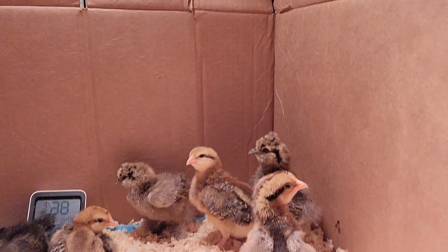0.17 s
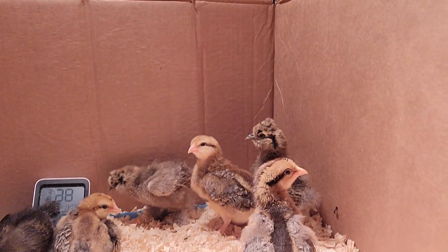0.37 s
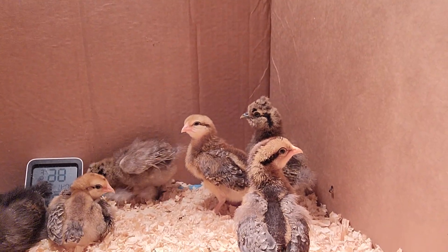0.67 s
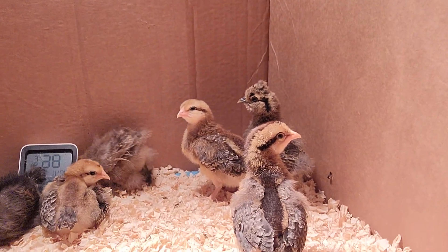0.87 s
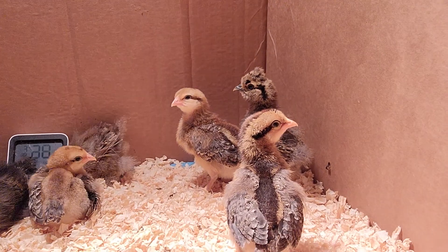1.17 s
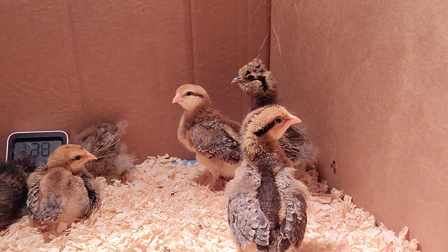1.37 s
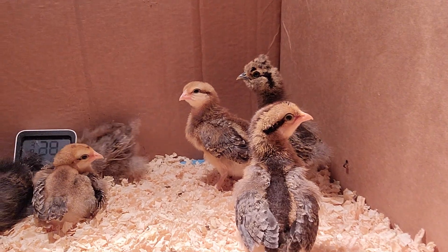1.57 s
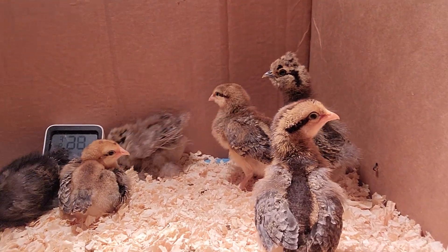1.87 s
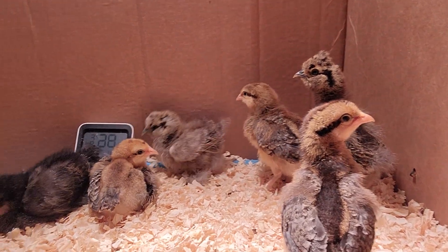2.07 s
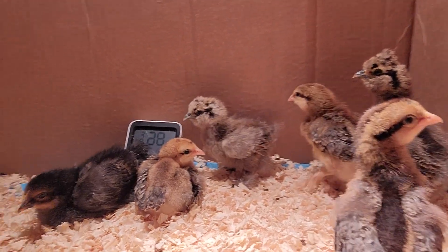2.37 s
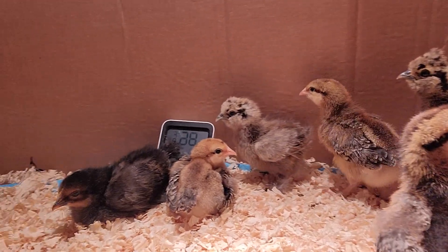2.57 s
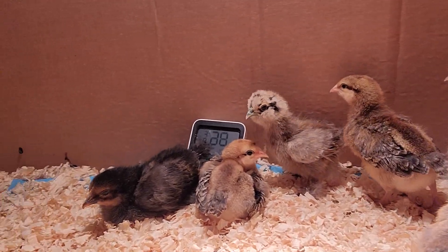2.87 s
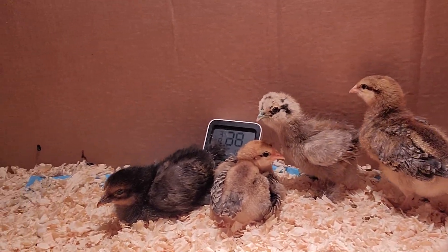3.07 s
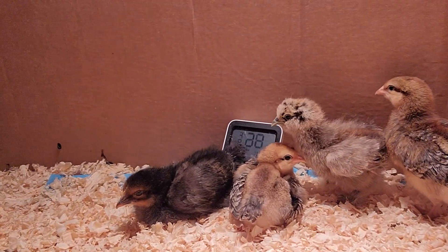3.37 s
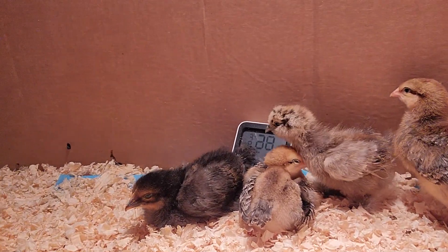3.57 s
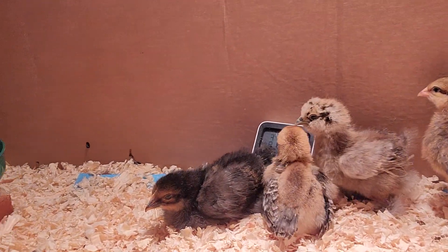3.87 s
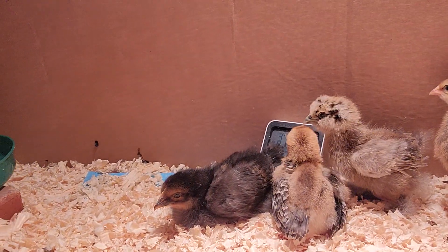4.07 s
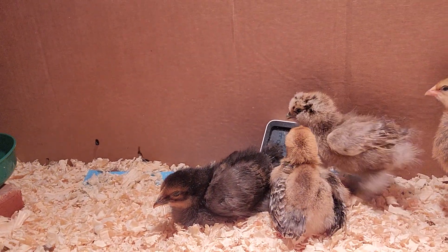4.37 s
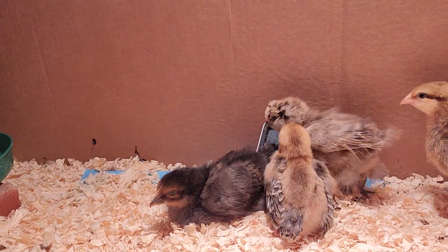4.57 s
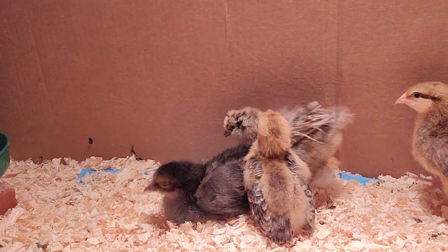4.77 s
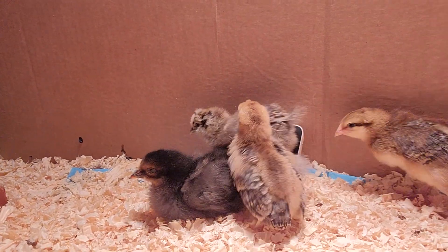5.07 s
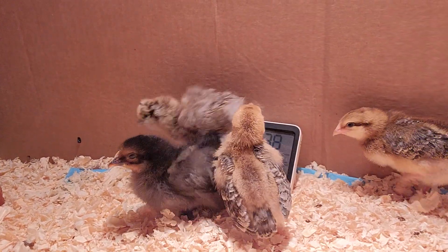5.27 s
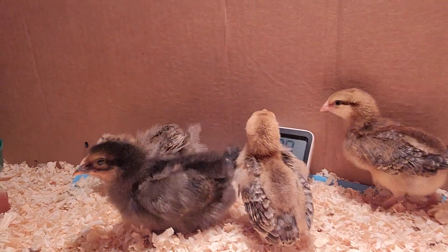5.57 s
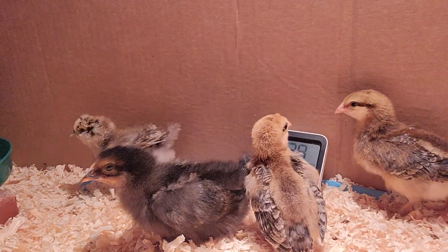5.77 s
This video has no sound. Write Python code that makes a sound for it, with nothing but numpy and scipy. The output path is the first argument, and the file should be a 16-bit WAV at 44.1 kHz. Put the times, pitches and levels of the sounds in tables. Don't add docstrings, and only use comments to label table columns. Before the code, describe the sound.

Young chicks give quick, high gliding peeps in a cardboard box while shavings rustle, a fan hums low, and soft bumps end in shoves.

```python
import sys
import numpy as np
from scipy import signal
from scipy.io import wavfile
from scipy.ndimage import uniform_filter1d

SR = 44100
rng = np.random.default_rng(int(sys.argv[2]) if len(sys.argv) > 2 else 0)


def volts(x):
    e = np.asarray(x, float) / 20
    return 10 ** e


def wav_out(sig):
    wavfile.write(sys.argv[1], SR, np.round(np.clip(np.atleast_2d(sig).T, -1, 1) * 32767).astype(np.int16))


N = 260631


def rms_one(x):
    return x / np.sqrt(np.mean(x ** 2) + 1e-20)


def in_time(rows):
    s, *columns = np.transpose(rows)
    return [np.interp(np.arange(N) / SR, s, c) for c in columns]


def at_hz(points, hz):
    table_hz, table_db = np.transpose(points)
    return np.interp(np.log(hz), np.log(table_hz), table_db)


def drift(rate_hz):
    r = np.exp(-80 * np.pi * rate_hz / SR)
    white = rng.standard_normal(N // 40 + 2002)
    slow = signal.lfilter([1], [1, -2 * r, r * r], white)[2000:]
    return np.interp(np.arange(N) / 40, np.arange(len(slow)), rms_one(slow))


def ring(clicks, hz, t60_s):
    r = volts(-60 / (t60_s * SR))
    w = 2 * np.pi * hz / SR
    return signal.lfilter([0, np.sin(w)], [1, -2 * r * np.cos(w), r * r], clicks + 1e-18)


def dying(clicks, t60_s):
    return signal.lfilter([1], [1, -volts(-60 / (t60_s * SR))], clicks + 1e-18)


def band(order, low_hz, high_hz):
    return signal.butter(order, [low_hz, high_hz], "band", fs=SR, output="sos")


# pitch_hz, likeness (1 = same)
PORT_LIKENESS = [(60, 0.91), (250, 0.86), (500, 0.52), (1000, 0.022), (4000, 0.014), (12000, 0.02)]


def grainy_noise(spectrum, patchy_db, grain_db):
    low_hz, top_hz = spectrum[0][0], spectrum[-1][0]
    edges = np.geomspace(low_hz, top_hz, 1 + int(3 * np.log2(top_hz / low_hz) + .5))
    white = rng.standard_normal((2, 2, N)) * volts(grain_db * drift(120))
    out = 0
    for k, (low, high) in enumerate(zip(edges, edges[1:])):
        mid, side = signal.sosfilt(band(2, low, high), white[k % 2])
        hz = np.sqrt(low * high)
        alike = at_hz(PORT_LIKENESS, hz)
        gain = volts(at_hz(spectrum, hz) + patchy_db * drift(3.47))
        out = out + gain * (np.sqrt(1 + alike) * mid + np.sqrt(1 - alike) * side * [[1], [-1]])
    return rms_one(out)


# start_s, level_db
FAN_HUM = [(0, -60.5), (.69, -59.5), (.79, -59), (1.17, -53), (1.5, -50.5), (2.5, -56.5), (3.41, -58),
           (3.46, -60.5), (3.52, -81), (3.69, -65), (3.75, -57.5), (4.35, -55), (4.51, -56.5), (5.3, -53),
           (5.74, -58), (5.91, -63.5)]
# pitch_hz, level_db (per Hz)
FAN_RUMBLE = [(22, -35.5), (40, -27), (58, -2), (75, -4), (95, 2), (125, -14), (160, -14.5), (220, -33)]


def fan():
    hum_hz, rumble_db, rumble_follows, sway_db, sway_s = 100.37, -57.5, .3, -42.5, .05
    hum_db, = in_time(FAN_HUM)
    phase = 2 * np.pi * np.cumsum(hum_hz + 1.575 * drift(3.6)) / SR
    hum = np.sqrt(2) * volts(hum_db + 0.5 + 0.5 * drift(1.5)) * np.sin(phase)
    from_shove_s = np.abs(np.arange(N) / SR - SHOVES[0][0])
    sway = volts(sway_db) * np.exp(-from_shove_s / sway_s)
    rumble = volts(rumble_db + rumble_follows * (hum_db - hum_db.mean())) + sway
    return hum + rumble * grainy_noise(FAN_RUMBLE, patchy_db=2.5, grain_db=4.5)


# start_s, level_db
RESTLESS = [(0, -73.5), (.18, -83.5), (.5, -77), (1.0, -78.5), (1.25, -86.5), (1.75, -79), (2.24, -82),
            (2.6, -78.5), (2.88, -81.5), (3.11, -76.5), (3.46, -84), (3.7, -76.5), (4.2, -80.5), (4.5, -76),
            (4.8, -75.5), (5.2, -71.5), (5.55, -73.5), (5.91, -70.5)]
# start_s, level_db (peak), dying_s, crispness_db
STIRS = [(.76, -87.5, 0.85, -13), (1.02, -75, 0.21, -5), (1.389, -74, 0.072, -7), (1.73, -71.5, 0.057, -2),
         (1.833, -71.5, 0.12, 0), (2.022, -67.5, 0.038, 4), (2.504, -70.5, 0.05, 2.5),
         (3.312, -73, 0.14, 3), (3.512, -71, 0.2, 0.5), (4.28, -80, 0.043, 7.5), (4.37, -73, 0.037, 2.5),
         (4.66, -69.5, 0.14, -2.5), (5.11, -69, 0.17, -1), (5.31, -69.5, 0.043, 1), (5.35, -64.5, 0.025, 2),
         (5.415, -67.5, 0.064, 14.5), (5.44, -63, 0.14, -1.5), (5.674, -71, 0.085, 10)]


def stirring(follows, crisp_share):
    resting_db, rise_s = -91, .0051
    restless_db, = in_time(RESTLESS)
    power = volts(2 * (resting_db + follows * (restless_db - resting_db)))
    t = np.arange(N) / SR
    for s, db, dying_s, crisp_db in STIRS:
        shape = np.exp(np.minimum((t - s) / rise_s, 2 * (s - t) / dying_s))
        power = power + volts(2 * (db + crisp_share * crisp_db)) * shape
    return np.sqrt(power)


# pitch_hz, level_db (per Hz)
CRISP = [(1800, -67), (2600, -1), (3400, 7), (4500, 3), (5600, -3), (9500, -5.5), (12000, -7), (15700, 6.5)]
# pitch_hz, level_db (per Hz)
SCUFF = [(700, 9), (1000, 0.5), (1350, 1), (1700, 2.5), (2200, 2), (3200, -2)]
# pitch_hz, level_db (per Hz)
SHUFFLE = [(110, 7), (160, -55.5), (250, 1.5), (450, 1.5), (750, -8), (1000, -39)]


def rustle():
    out = volts(6.5) * stirring(1, 0.57) * grainy_noise(CRISP, patchy_db=1.6, grain_db=2.0)
    out += volts(0.5) * stirring(1, -0.75) * grainy_noise(SCUFF, patchy_db=3.0, grain_db=1.5)
    out += volts(6) * stirring(0.77, -0.79) * grainy_noise(SHUFFLE, patchy_db=-2.0, grain_db=2.5)
    return out


# start_s, level_db (peak), left_minus_right_db
SNAPS = [(0.0385, -58, 12), (1.018, -54, -3), (1.845, -48.5, -9), (2.007, -51.5, -10), (2.492, -59, -15),
         (3.241, -58, 0), (3.3169, -59, -0.5), (3.5118, -66, -1), (3.6511, -83, 30), (4.282, -56, 2),
         (4.3879, -58, -8), (4.672, -51.5, -17), (5.1162, -42, -6), (5.2135, -53.5, -12), (5.231, -54, -2),
         (5.3107, -54, -24.5), (5.353, -44, -1), (5.3706, -52, -12), (0.866, -71, -5), (1.171, -55, -2),
         (4.596, -53, 0), (5.4186, -46, -11), (5.5026, -54, -22), (5.6725, -72, -8), (5.7145, -45, 1),
         (5.834, -49, 4)]


def snaps():
    s, db, pan_db = np.transpose(SNAPS)
    hits = np.zeros((2, N))
    hits[:, np.round(s * SR).astype(int)] = volts(db - 8.0 + pan_db * np.array([[.5], [-.5]]))
    noise = dying(hits, .045) * rng.standard_normal((2, N))
    return signal.sosfilt(signal.butter(1, 5000, "high", fs=SR, output="sos"), noise)


def room(x):
    t60_s, level_db = .14, -12.5
    t = np.arange(round(.3 * SR)) / SR
    tail = rng.standard_normal((2, len(t))) * volts(-60 * t / t60_s) * (t > .004)
    tail = tail / np.sqrt(np.sum(tail ** 2, axis=1, keepdims=True))
    return volts(level_db) * signal.fftconvolve(x, tail, axes=1)


def glide(length_s, first_hz, last_hz):
    half_share, sharpness = .6, 2.5
    share = np.linspace(0, 1, round(length_s * SR))
    bend = np.log(1 - .5 ** (1 / sharpness)) / np.log(half_share)
    return share, first_hz + (last_hz - first_hz) * (1 - (1 - share ** bend) ** sharpness)


# start_s, pitch_hz, level_db
FLAT_CALLS = [
    [(1.089, 3900, -58), (1.1, 4030, -59), (1.12, 4290, -57), (1.15, 4330, -55), (1.174, 4270, -48),
     (1.187, 3880, -48.5), (1.197, 3080, -48.5), (1.205, 2700, -64)],
    [(1.446, 4090, -58), (1.458, 4460, -51), (1.475, 4580, -47.5), (1.534, 4450, -43), (1.543, 3950, -46.5),
     (1.551, 3170, -45), (1.558, 2700, -51)],
    [(5.347, 4230, -46), (5.36, 4320, -42), (5.385, 4420, -46), (5.399, 4470, -54), (5.411, 4490, -47),
     (5.418, 3900, -41.5), (5.424, 3110, -38.5), (5.43, 2520, -56)],
]
NEAR_CALLS = [
    [(.638, 4280, -64), (.65, 4550, -59), (.668, 4580, -63), (.685, 4270, -57), (.708, 4020, -53.5),
     (.722, 3250, -47), (.735, 2810, -66.5)],
    [(2.203, 4000, -57), (2.212, 4330, -54), (2.235, 4486, -44.5), (2.255, 4390, -48), (2.28, 3960, -45),
     (2.3, 3083, -41), (2.318, 2410, -64)],
    [(3.197, 3960, -54), (3.21, 4154, -50), (3.225, 4185, -47), (3.255, 4105, -50.5), (3.27, 3840, -53.5),
     (3.29, 3013, -46.5), (3.305, 2630, -71)],
    [(4.571, 4050, -54), (4.58, 4350, -48), (4.6, 4580, -42), (4.625, 4356, -47.5), (4.655, 4080, -42.5),
     (4.68, 3060, -40.5), (4.697, 2510, -62.5)],
    [(5.101, 4105, -49), (5.115, 4480, -50), (5.13, 4560, -37.5), (5.15, 4650, -35.5), (5.17, 4350, -41),
     (5.188, 3630, -33), (5.203, 2500, -43.5)],
    [(5.716, 3900, -48.5), (5.73, 4270, -55), (5.745, 4340, -53), (5.77, 4240, -55), (5.795, 3730, -42),
     (5.808, 3400, -44), (5.823, 3050, -42), (5.833, 2700, -54.5), (5.846, 2650, -62)],
]
MID_CALLS = [
    [(3.757, 4100, -54), (3.77, 4400, -55), (3.79, 4380, -40.5), (3.82, 4215, -37.5), (3.845, 3840, -41.5),
     (3.862, 2990, -42), (3.878, 2480, -69.5)],
    [(4.038, 4170, -50.5), (4.055, 4390, -43), (4.07, 4390, -44.5), (4.1, 4240, -40), (4.125, 3840, -43),
     (4.14, 3035, -41), (4.157, 2390, -57.5)],
]
FAR_CALLS = [
    [(.427, 4280, -64), (.438, 4360, -55.5), (.455, 4470, -61), (.48, 4200, -60), (.5, 3450, -52.5),
     (.52, 3200, -63.5)],
    [(1.966, 4190, -57), (1.98, 4720, -53), (1.99, 4750, -47), (2.01, 4640, -44.5), (2.035, 4080, -47),
     (2.06, 3520, -41), (2.077, 3020, -61)],
]
# start_s, pitch_hz, level_db
BENT_CALLS = [
    [(.16, 2830, -65), (.18, 2830, -50), (.195, 3450, -48), (.212, 4000, -62), (.222, 4080, -77)],
    [(.235, 4080, -53), (.25, 4100, -54), (.265, 3656, -45), (.283, 3435, -52.5), (.312, 3010, -65)],
    [(2.93, 3790, -63), (2.945, 3850, -71), (2.965, 3800, -55), (2.982, 3410, -50), (3.005, 3250, -57)],
    [(3.906, 4080, -55), (3.918, 4030, -46.5), (3.935, 3940, -49.5), (3.965, 3230, -49), (3.988, 3020, -59)],
    [(5.146, 3200, -61), (5.158, 3035, -46), (5.17, 2800, -34.5), (5.183, 2530, -46.5), (5.193, 2430, -56)],
    [(5.422, 2036, -49), (5.432, 2563, -47), (5.441, 3060, -40.5), (5.452, 3350, -56)],
    [(5.457, 3000, -54), (5.462, 2650, -48), (5.466, 2400, -47), (5.471, 2150, -52)],
]
# start_s, length_s, first_pitch_hz, last_pitch_hz, level_db
SLIDES_LEFT = [
    (0.763, 0.077, 3807, 2690, -47.5),
    (1.697, 0.055, 3680, 3020, -47.5),
    (2.772, 0.056, 3510, 2730, -50),
    (3.737, 0.068, 3670, 2830, -48),
    (5.001, 0.066, 3610, 2544, -49),
    (5.025, 0.057, 2736, 2280, -45.5),
]
SLIDES_MID = [
    (0.615, 0.05, 3616, 2680, -45),
    (4.295, 0.058, 3112, 2830, -47),
]
# share of its length, level_db
SLIDE_EFFORT = [(0, -9), (.15, -5.5), (.45, -3.5), (.75, -7), (1, -16)]
# start_s, length_s, first_pitch_hz, last_pitch_hz, level_db
SECOND_VOICE = [
    (5.456, 0.018, 3150, 3080, -48),
    (3.774, 0.046, 4600, 4500, -54),
    (5.7, 0.024, 3170, 2950, -58),
    (5.348, 0.059, 4720, 4900, -54.5),
    (5.737, 0.037, 4600, 4500, -53.5),
]
# pitch_hz, level_db
COLOURS = [
    [(3100, 2.5), (3500, -4.5), (3850, 2.5), (4100, 4), (4280, -4), (4430, 0), (4550, -4.5)],
    [(2500, -2), (2950, 8.5), (3400, 0), (3850, 0), (4250, 2.5), (4450, -4), (4650, -0.5)],
    [(2850, 1), (3400, -7.5), (3950, 2), (4120, -1), (4290, 1.5), (4340, -3), (4420, -1.5)],
    [(3200, 8.5), (3600, -4), (3950, 9.5), (4150, 3), (4400, -1.5), (4600, 1), (4800, -4)],
    [(2500, -2), (3100, -1), (3600, -3.5), (4100, 0)],
]
SLIDE_COLOURS = [
    [(2800, -2.5), (3150, 3.5), (3350, -5.5), (3550, -1), (3750, -6.5), (4000, 11), (4800, 6)],
    [(2700, -4), (2950, -5.5), (3150, 4.5), (3350, -12), (3550, -1), (3950, -27)],
]
# left_minus_right_db, rasp_depth_db,
# octave_db
SEATS = [
    (0.5, -12.5, -27.5),
    (1.5, 19.5, -31.5),
    (-0.8, 1, -32),
    (0.8, 11, -32),
    (6, 1.5, -42.5),
    (1, 1.5, -52),
]
LEANS_DB = [3.5, 1.5, 3, 2.5, 2, 2.5, 4, 3, 1.5, -2, 0, -3, -1, 1, 3, 3, -1, 10, 5, 2]


def calls():
    leans = iter(LEANS_DB)
    broods = (FLAT_CALLS, NEAR_CALLS, MID_CALLS, FAR_CALLS, BENT_CALLS)
    for arches, colour, seat in zip(broods, COLOURS, SEATS):
        for s, hz, db in map(np.transpose, arches):
            t = np.arange(s[0], s[-1], 1 / SR)
            hz = uniform_filter1d(np.interp(t, s, hz), size=350, mode="nearest")
            yield s[0], hz, np.interp(t, s, db) + at_hz(colour, hz), (next(leans), *seat[1:])
    for rows, colour, seat in zip((SLIDES_LEFT, SLIDES_MID), SLIDE_COLOURS, SEATS[-2:]):
        for s, length_s, first_hz, last_hz, db in rows:
            share, hz = glide(length_s, first_hz, last_hz)
            effort_db = np.interp(share, *np.transpose(SLIDE_EFFORT))
            yield s, hz, db + effort_db + at_hz(colour, hz), seat
    for s, length_s, first_hz, last_hz, db in SECOND_VOICE:
        share, hz = glide(length_s, first_hz, last_hz)
        yield s, hz, db - 7.1 * share ** 2, SEATS[-2]


# centre_s, level_db
SWELLS = [(.185, 5), (.255, -7), (0.273, 8), (.48, 6.5), (.632, 3.5), (.682, 2), (0.711, 7), (.773, 6),
          (0.793, 12), (1.092, 2.5), (1.158, 8), (1.187, 5), (1.451, 4.5), (1.467, 6), (1.491, -7),
          (1.503, 1.5), (1.545, 6.5), (2.041, 7), (2.048, -4), (2.227, 3), (2.243, -7), (2.255, 2),
          (2.268, 3), (2.279, 13), (2.806, 6.5), (3.218, 1), (3.244, 2.5), (3.254, 3), (3.289, 7),
          (3.763, 3), (3.778, 3.5), (3.808, 0), (3.82, 3), (3.862, 5), (3.912, -3), (3.932, 6.5),
          (3.968, 4.5), (4.047, 3), (4.093, 7), (4.115, 5), (4.14, 11), (4.581, 1), (4.601, 1), (4.628, 0),
          (4.648, 3.5), (4.671, -8.5), (4.681, -2), (4.69, -6), (5.105, -3), (5.133, 3), (5.144, 2.5),
          (5.172, -2.5), (5.42, 6), (5.433, -2.5), (5.441, 4), (5.453, -12), (5.46, 4), (5.752, 4),
          (5.811, 7), (5.823, 8)]
# centre_s, depth_db
DIPS = [(.64, 11), (.672, 10), (.695, 14), (.782, 14), (.801, 12), (1.114, 8), (1.178, 10), (1.456, 12),
        (1.474, 12), (1.511, 5), (2.214, 8), (2.239, 8), (2.262, 12), (2.274, 12), (2.285, 16),
        (3.203, 6), (3.21, 8), (3.237, 6), (3.25, 20), (3.27, 12), (3.77, 12), (3.796, 9), (3.826, 14),
        (3.849, 12), (3.857, 12), (3.918, 13), (3.945, 16), (3.961, 9), (4.057, 9), (4.081, 7),
        (4.107, 21), (4.123, 9), (4.131, 17), (4.592, 14), (4.616, 6), (4.633, 14), (4.639, 18),
        (4.654, 14), (5.109, 10), (5.154, 16), (5.772, 6), (5.8, 14)]


def level_flutter():
    swell_s, dip_s = .0062, .0022
    t = np.arange(N) / SR
    flutter_db = 1.3 * drift(80)
    for s, db in SWELLS:
        flutter_db = flutter_db + db * np.exp(-((t - s) / swell_s) ** 2)
    for s, db in DIPS:
        flutter_db = flutter_db - db * np.exp(-((t - s) / dip_s) ** 2)
    return flutter_db


# start_s, extra_rasp_db, clear_s
HOARSE = [(.16, 2, .23), (.235, 2, .31), (.427, 2, .52), (.642, 4, .7), (1.087, 5, 1.145), (2.2, 3, 2.27),
          (2.773, 2, 2.83), (2.93, 2.5, 3.0), (3.196, 3.5, 3.275), (3.757, 3, 3.85), (5.423, 4, 5.46),
          (5.456, 3, 5.48), (5.712, 4.5, 5.798)]
MUFFLED_S = [1.087, 5.716]


def peeps():
    rasp_hz, far_wall_s, far_wall_db = 283, .0095, -11
    pan_db_per_octave = 7
    out = np.zeros((2, N + SR))
    every = list(calls())
    bounce_s = 0.001013 + .007 * rng.random((len(every), 2, 4))
    lag_s = .00005 * np.sign(rng.uniform(-1, 1, len(every)))
    flutter_db, waver_hz = level_flutter(), 25 * drift(60)
    buzz = 2 * np.pi * np.cumsum(rasp_hz + 75 * drift(50)) / SR
    for (s, hz, db, (pan_db, rasp_db, octave_db)), bounces, lag in zip(every, bounce_s, lag_s):
        now = round(s * SR) + np.arange(len(hz))
        rasp_db = np.clip(rasp_db, 0, .6)
        for at_s, hoarse_db, clear_s in HOARSE:
            if abs(at_s - s) < .006:
                rasp_db = rasp_db + hoarse_db * np.clip((clear_s - now / SR) / .01, 0, 1)
        octave_db = min(octave_db, -28)
        if any(abs(at_s - s) < .006 for at_s in MUFFLED_S):
            octave_db -= 20
        hz = hz + waver_hz[now]
        phase = 2 * np.pi * np.cumsum(hz) / SR - 0.019 * rasp_db * np.cos(buzz[now])
        level = volts(db + flutter_db[now] + rasp_db * np.sin(buzz[now]))
        fade = np.clip(np.minimum(now - now[0], now[-1] - now) / SR / 0.0024, 0, 1)
        octave = volts(octave_db + 5 * np.log2(3800 / hz)) * np.sin(2 * phase)
        tone = np.sqrt(2) * level * fade * (np.sin(phase) + octave)
        tail = room(tone[None])
        out[:, now[0]:now[0] + tail.shape[1]] += tail
        lean_db = pan_db + pan_db_per_octave * np.log2(hz / 3900)
        for port, side in enumerate((.5, -.5)):
            delays_s = [0, far_wall_s + .1 * bounces[port, 0], *bounces[port]]
            losses_db = [-1, far_wall_db, *(-14 - 500 * bounces[port])]
            for delay, loss_db in zip(delays_s, losses_db):
                at = round((s + delay + side * lag) * SR)
                out[port, at:at + len(now)] += volts(loss_db + side * lean_db) * tone
    return out[:, :N]


# pitch_hz, width_hz, level_db
AIR_MODES = [
    (2716, 40, -8),
    (3048, 55, -4),
    (3450, 40, -10),
    (3985, 60, -7),
    (4275, 64, -12),
]


def air(x):
    out = x.copy()
    for k, (hz, width_hz, db) in enumerate(AIR_MODES):
        r = np.exp(-np.pi * width_hz / SR)
        poles = [1, -2 * r * np.cos(2 * np.pi * hz / SR), r * r]
        mode = signal.lfilter([(1 - r * r) / 2, 0, (r * r - 1) / 2], poles, x + 1e-18)
        out += volts(db) * (-1) ** k * mode
    return out


# start_s, level_db (peak)
SHOVES = [
    (5.475, -15),
    (5.538, -19),
    (5.6, -57),
]
# pitch_hz, level_db, t60_s
BOX = [(61.4, -10.5, 0.097), (145, -27, 0.36), (205.7, -6, 0.13), (261, -27, 0.21), (321, -18, 0.17),
       (418, -18, 0.12), (510, -66, 0.54), (630, -48, 0.057)]


def panel_booms(at, db, boom_db):
    push, shove = np.zeros((2, N))
    push[at] = volts(db)
    for s, shove_db in SHOVES:
        shove[round(s * SR)] = volts(shove_db)
    out = (-2.4 * ring(push, 430, 0.013) + 0.32 * ring(shove, 110, 0.019)) * np.ones((2, 1))
    for k, (hz, level_db, t60_s) in enumerate(BOX):
        clicks = np.zeros(N)
        clicks[at + 190] = volts(db + boom_db + level_db + rng.standard_normal(len(at)))
        out += ring(clicks, hz, t60_s) * volts([[0.68 * (-1) ** k], [0]])
    return signal.sosfilt(band(3, 50, 700), out)


# pitch_hz, level_db, t60_s
BOX_HIGH = [(720, 14.5, 0.0019), (1094, -1, 0.043), (1367, 3, 0.035), (1664, -3, 0.056), (1975, 3.5, 0.019),
            (2600, -9, 0.028), (3900, -12, 0.025)]


def hard_contacts(at, db):
    crush = np.zeros(N)
    crush[at] = volts(db)
    grains = .6 * dying(crush, .08) * (rng.random(N) < 330 / SR)
    spot_db = 4 * drift(8)
    out = np.zeros((2, N))
    for k, (hz, level_db, t60_s) in enumerate(BOX_HIGH):
        tick = 0.45 * (-1) ** k * crush * volts(spot_db * np.sin(2.4 * k))
        strikes = grains * rng.standard_normal((2, N)) + tick
        out += volts(level_db) * ring(strikes, hz, t60_s)
    return out


# start_s, level_db (peak), hardness_db, boom_db
THUDS = [(0.864, -60.5, 4, -17), (0.931, -59, -14, -20), (0.942, -59.5, -3.5, -20), (0.979, -58, -17, -22),
         (1.014, -41.5, -10, -0.5), (1.023, -44.5, -19, -6), (1.033, -44.5, -13, -20),
         (1.081, -53, -22, -28), (1.124, -56, -13, -33), (1.397, -47, -16, 2), (1.743, -59, -13, -20),
         (1.84, -59.5, -1.5, -28), (2.548, -51, -31, -34), (2.588, -59, -37, -25), (3.506, -56.5, -31, 5.5),
         (3.749, -55, -22, 5.5), (4.607, -39.5, -29, 5.5), (4.679, -55.5, -11, 0), (4.913, -53.5, -15, -17),
         (5.063, -49, -44, -11), (5.31, -63, -5, 10), (5.347, -51, -13, -3), (5.41, -53, 6.5, 15),
         (5.42, -56, 6.5, -10), (5.461, -35.5, -24, 10), (5.573, -53, -14, 10.5), (5.711, -70, 16, 10)]


def thuds():
    s, db, hard_db, boom_db = np.transpose(THUDS)
    at = np.round((s + 0.00243) * SR).astype(int)
    out = panel_booms(at, db, boom_db) + hard_contacts(at, db + hard_db)
    return out + room(out)[:, :N]


def scene():
    return fan() + rustle() + snaps() + air(peeps()) + thuds()


def band_limit(x):
    return signal.sosfilt(signal.butter(12, 15730, fs=SR, output="sos"), x)


def record(dry):
    loud = signal.sosfilt(band(4, 3900, 4800), dry.mean(axis=0))
    loud_db = 10 * np.log10(uniform_filter1d(loud ** 2, size=1024) + 1e-14)
    masked = signal.sosfiltfilt(band(4, 5000, 6600), dry)
    faint_db = 10 * np.log10(uniform_filter1d(np.mean(masked ** 2, axis=0), size=2048) + 1e-14)
    mix = dry - masked * np.clip((loud_db - faint_db - 29) / 3, 0, 1)
    mix = signal.sosfiltfilt(signal.ellip(10, .2, 50, 15720, fs=SR, output="sos"), mix)
    return band_limit(mix)


dry = scene()
out = record(dry)
wav_out(out)
```